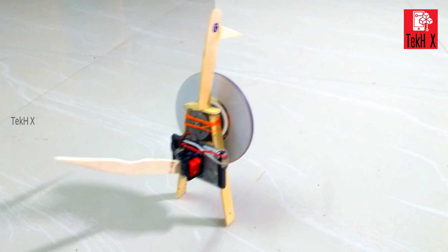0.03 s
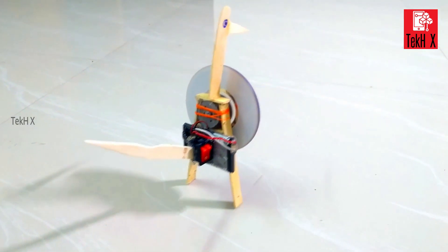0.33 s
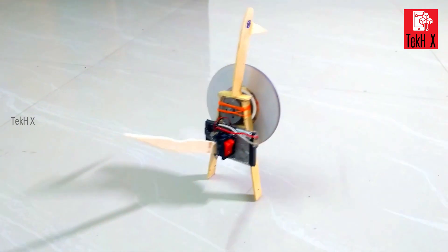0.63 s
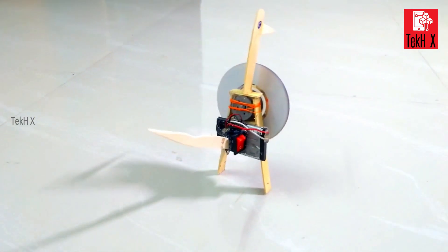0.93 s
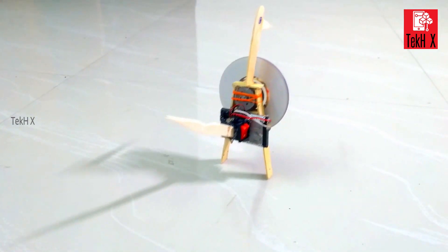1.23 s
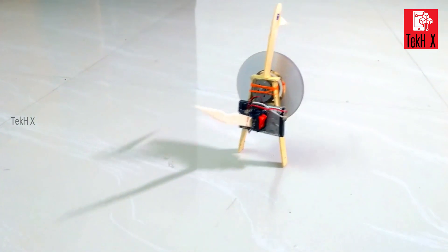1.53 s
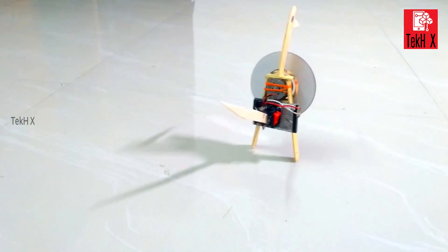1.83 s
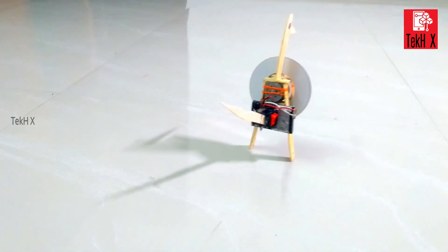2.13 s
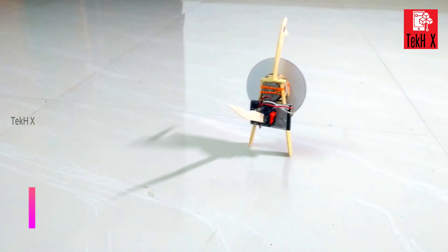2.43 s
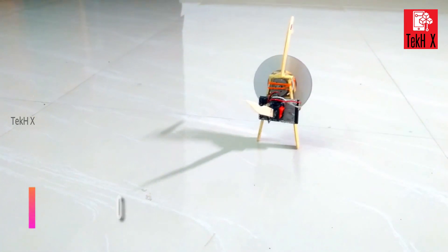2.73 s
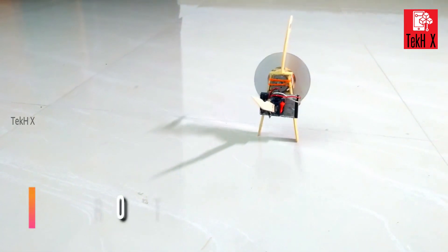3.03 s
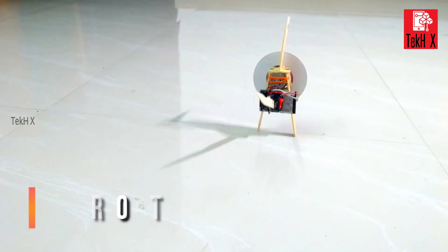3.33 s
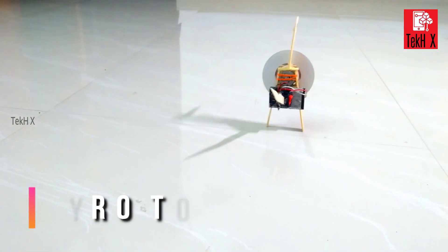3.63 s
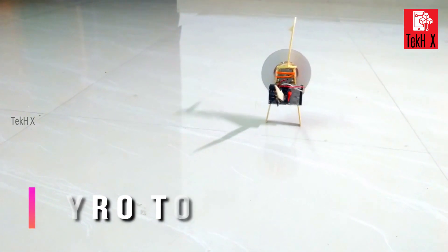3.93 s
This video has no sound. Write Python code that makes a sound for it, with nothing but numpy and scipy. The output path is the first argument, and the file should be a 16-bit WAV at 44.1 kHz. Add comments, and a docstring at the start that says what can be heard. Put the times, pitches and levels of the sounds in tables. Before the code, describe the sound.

A small motorised toy rattles on floor tiles from the start until about 4 seconds, its wooden legs chattering rapidly over a steady buzz, dull knocking and a thin, wavering ring. Sharp, irregular taps occur throughout, sparser after 3 seconds. The chatter changes tone between about 0.6 and 2 seconds as the toy turns away, and its low thudding gradually fades. The bare room echoes faintly.

```python
"""A small walking toy of wooden sticks shuffles away over floor tiles, shaken by a motor spinning a disc.
Every turn of the unbalanced disc rattles the mount, rings the frame and drops the legs on the tile.
The sticks knock, the battery box thuds, loose parts ping; now and then a leg lands squarely with a
sharp tap. A bare room answers faintly, over a low drone and room tone."""
import sys
import numpy as np
from scipy import signal
from scipy.io import wavfile
from scipy.ndimage import uniform_filter1d

SR = 44100
rng = np.random.default_rng(int(sys.argv[2]) if len(sys.argv) > 2 else 0)


def master(y):
    """Save y as 16-bit WAV."""
    cut = np.clip(np.atleast_2d(y).T, -1, 1)
    pcm = np.round(cut * 32767)  # scale
    wavfile.write(sys.argv[1], SR, pcm.astype(np.int16))


N = 176400
T = np.arange(N) / SR
TURN_HZ, LANDING_TURNS = 60.6, .22
TICK_RISE_S = 0.000082

# Leg chatter envelope: time_s, level_db
FEET_ENVELOPE = [(0.06, -60.5), (0.49, -48.5), (0.87, -54.5), (1.01, -49), (1.13, -54), (1.54, -49.5),
                 (1.63, -56), (1.93, -46), (2.02, -57), (2.11, -45), (2.24, -49.5), (2.45, -50.5),
                 (2.7, -46.5), (3.16, -46), (3.35, -47), (3.58, -46.5), (3.7, -51), (3.83, -44),
                 (3.99, -50)]
# Wood on tile, near: freq_hz, left_db, right_db
FEET_NEAR_COLOUR = [(100, -42, -32), (1490, -15.5, -5), (2730, -24.5, -37), (3310, 10.5, 5),
                    (4100, -17, -14), (4980, 5.5, 5), (5600, -0.5, -13), (7500, 0.5, -12),
                    (10300, -12, -30), (15300, -26, -46)]
# Stick knock: freq_hz, left_db, right_db
KNOCK_COLOUR = [(60, -37, -36), (272, -25, -17), (383, -11, -4.5), (454, 1, 2), (560, -1.5, -0.5),
                (650, 4.5, 2.5), (764, -0.5, -1), (920, 2, 1.5), (1220, -14.5, -11.5), (1320, -7.5, -5),
                (2500, -7, -9), (5960, -74, -33)]


def amp(db):
    """Decibels to gain."""
    return 10 ** (np.asarray(db) / 20)


def unit(x):
    """Scale to rms 1."""
    return x / np.sqrt(np.mean(x ** 2) + 1e-20)


def wander(rate_hz):
    """Smooth noise, rms 1."""
    return unit(signal.resample(rng.standard_normal(int(rate_hz * N / SR)), N))


def level(envelope):
    """Gain over time from time_s, level_db points."""
    return amp(np.interp(T, *np.transpose(envelope)))


def at_hz(table, hz):
    """Table columns interpolated over log frequency."""
    table_hz, *columns = np.transpose(table)
    return np.array([np.interp(np.log(hz + 1), np.log(table_hz + 1), column) for column in columns])


def convolve(x, response):
    """Filter to two channels, N samples."""
    return signal.oaconvolve(np.atleast_2d(x) * np.ones((2, 1)), response, axes=1)[:, :N]


def body(colour, ripple_db=0, size=2048):
    """Minimum-phase response of a colour; random ripple stands for one contact point."""
    hz = np.fft.rfftfreq(size, 1 / SR)
    ripple = unit(uniform_filter1d(uniform_filter1d(rng.standard_normal(len(hz)), size=40), size=24))
    log_gain = np.log(amp(at_hz(colour, hz) + ripple_db * ripple * np.minimum(hz / 3000, 1)))
    mirrored = np.concatenate([log_gain, log_gain[:, -2:0:-1]], 1)
    return np.fft.ifft(np.exp(np.conj(signal.hilbert(mirrored)))).real


def ringing(modes):
    """Complex response of decaying modes, 1 ms rise."""
    t = T[:SR // 3]
    ring = sum(amp(db - 60 * t / t60_s) * np.exp(2j * np.pi * hz * t) for hz, db, t60_s in modes)
    return ring * (1 - np.exp(-t / .001))


def add(mix, at, sound):
    """Mix in at a sample index."""
    part = mix[:, at:at + sound.shape[1]]
    part += sound[:, :part.shape[1]]


def strikes(phase_turns, spread_turns, scatter_db, turn_db, count):
    """Clicks bunched round one phase of each turn; force varies per click and per turn."""
    turns = np.arange(int(N / SR * TURN_HZ) + 1)[:, None]
    jitter, click_force = rng.standard_normal((2, len(turns), count))
    turn_force = np.clip(rng.standard_normal(turns.shape), -1.7, 1.7)
    click_force = np.clip(click_force, -1.8, 1.8)
    start_s = (turns + LANDING_TURNS + phase_turns + spread_turns * jitter) / TURN_HZ
    at = np.round(start_s * SR).astype(int)
    force = amp(scatter_db * click_force + turn_db * turn_force) * rng.choice([-1, 1], at.shape)
    return unit(np.bincount(at.ravel() % N, force.ravel(), N))


def rattle(clicks, colour, ripple_db, width, points=6):
    """Each click hits a random contact point; width is the power share out of step between the ears."""
    point, out = rng.integers(0, points, N), np.zeros((2, N))
    for k in range(points):
        left = clicks * (point == k)
        scrambled = np.roll(left * rng.choice([-1, 1], N), rng.integers(-6, 7))
        right = np.sqrt(1 - width) * left + np.sqrt(width) * scrambled
        out += convolve([left, right], body(colour, ripple_db))
    return unit(out)


def tick(hz, rise_s, ring_s):
    """A few cycles of a struck tip, energy 1; the right ear lags."""
    t = T[:256]
    envelope = (1 - np.exp(-t / rise_s)) ** 2 * np.exp(-t / ring_s)
    wave = envelope * np.sin(2 * np.pi * hz * t - np.array([[0], [.6]]))
    return wave / np.linalg.norm(wave[0])


def sprinkle(clicks, pitch_curve, log_spread, ring_s):
    """One tick per click, pitch scattered round a curve."""
    pitch_hz, out = np.interp(T, *np.transpose(pitch_curve)), np.zeros((2, N))
    detune = np.exp(log_spread * np.clip(rng.standard_normal(N), -1.7, 1.7))
    for at in np.flatnonzero(clicks):
        add(out, at, clicks[at] * tick(pitch_hz[at] * detune[at], TICK_RISE_S, ring_s))
    return out


def feet():
    """Legs chatter on the tile once a turn, with small bounces; thinner as the toy turns away."""
    # Wood on tile, turned away: freq_hz, left_db, right_db
    far_colour = [(100, -49, -31), (1510, -43, -16.5), (2760, -6, 4.5), (3450, 6.5, -1), (4300, 10.5, -7),
                  (5000, -7, 5.5), (5950, -2.5, 0.5), (7150, 8, 1.5), (8000, -8, -23), (10500, -2.5, -22),
                  (14700, -63, -36)]
    landings = strikes(phase_turns=0, spread_turns=.06, scatter_db=3, turn_db=5, count=3)
    bounces = strikes(phase_turns=-.05, spread_turns=.19, scatter_db=2, turn_db=5, count=3)
    clicks = landings + amp(-8) * bounces
    away = np.interp(T, [.62, 2.1], [0, 1])
    near = rattle(clicks, FEET_NEAR_COLOUR, ripple_db=-2, width=.58)
    far = amp(-1) * rattle(clicks, far_colour, ripple_db=-.5, width=.42)
    return amp(-3.5) * level(FEET_ENVELOPE) * (np.sqrt(1 - away) * near + np.sqrt(away) * far)


def patter():
    """Stick tips touch lightly, each touch at its own pitch."""
    # Tip ticks: time_s, pitch_hz
    pitch_curve = [(0, 4300), (1.2, 4600), (2.0, 5250), (3.0, 5580), (4.0, 5100)]
    tight = strikes(phase_turns=0, spread_turns=.083, scatter_db=-1, turn_db=4.5, count=1)
    stray = strikes(phase_turns=.03, spread_turns=.2, scatter_db=3, turn_db=3, count=2)
    ticks = sprinkle(tight + amp(6.5) * stray, pitch_curve, log_spread=.14, ring_s=.00051)
    return amp(-5.5) * level(FEET_ENVELOPE) * unit(ticks * amp([[0], [-6]]))


def pings():
    """Loose hard parts ping on the disc's upswing."""
    # Ping envelope: time_s, level_db
    envelope = [(0.06, -61), (0.33, -58), (0.6, -70), (0.88, -66), (1.1, -75), (1.3, -67), (1.5, -78),
                (1.85, -64), (2.04, -81), (2.16, -67), (2.6, -79), (4.0, -72)]
    # Ping centre: time_s, pitch_hz
    pitch_curve = [(0, 7800), (.72, 8000), (.8, 10900), (1.8, 11500), (2.3, 11100), (4.0, 10200)]
    clicks = strikes(phase_turns=-.4, spread_turns=.05, scatter_db=2.5, turn_db=4, count=2)
    ticks = sprinkle(clicks, pitch_curve, log_spread=.05, ring_s=.0003)
    return level(envelope) * unit(ticks * amp([[0], [-8]]))


def mount():
    """The loose motor mount buzzes twice a turn; its small hard parts sizzle."""
    # Buzz and sizzle envelopes: time_s, level_db
    buzz_envelope = [(0.06, -46), (0.2, -49.5), (0.5, -48), (0.61, -51), (0.77, -48), (1.04, -50.5),
                     (1.12, -53), (1.27, -49), (1.36, -51.5), (1.95, -49.5), (2.03, -53.5), (2.42, -49.5),
                     (3.0, -53), (3.13, -49), (3.29, -53.5), (3.62, -49.5), (3.72, -53.5), (3.99, -50)]
    sizzle_envelope = [(0.06, -52), (0.45, -58.5), (0.61, -71), (0.73, -56.5), (1.11, -65), (1.27, -64),
                       (1.52, -69), (1.86, -62), (2.05, -69), (2.16, -54), (2.34, -85), (2.41, -53),
                       (2.5, -69), (3.08, -58.5), (3.37, -67), (3.99, -62.5)]
    # Mount and small-part responses: freq_hz, left_db, right_db
    buzz_colour = [(101, -31, -45), (1260, -4, 1), (1600, -4, 3), (2330, -8, -4.5), (2830, -0.5, -8),
                   (3210, 2.5, -7), (3370, 10.5, -2), (3500, 5.5, 1.5), (3970, 6.5, 1), (4740, -13, -15),
                   (6840, -10, -12.5), (7900, -9, -14), (9800, -14, -48), (10800, -26.5, -9.5),
                   (12950, -15, -53), (14600, -47, -71)]
    sizzle_colour = [(100, -13, -16), (3000, 6, 2), (6700, 3.5, 0), (7860, 12.5, -13), (10000, -14.5, -20),
                     (10770, -1, -14), (12700, -8.5, -11), (13100, -6, -23), (14300, -50, -53)]
    upswing = strikes(phase_turns=-.38, spread_turns=.08, scatter_db=4, turn_db=3, count=7)
    landing = strikes(phase_turns=.02, spread_turns=.1, scatter_db=4, turn_db=3.5, count=6)
    fine = strikes(phase_turns=-.4, spread_turns=.06, scatter_db=3, turn_db=5, count=3)
    buzz = rattle(upswing + amp(-.5) * landing, buzz_colour, ripple_db=4.5, width=.96)
    sizzle = rattle(fine + amp(-5) * landing, sizzle_colour, ripple_db=3, width=1)
    return amp(1.1) * level(buzz_envelope) * buzz + amp(3.5) * level(sizzle_envelope) * sizzle


def frame():
    """The frame rings after each upswing; its pitch wanders and slowly sags."""
    # Frame modes: freq_hz, level_db, t60_s
    modes = [(1820.5, 13.5, 0.062), (1758, 6.5, 0.046)]
    # Ring envelope: time_s, level_db
    envelope = [(0.06, -48), (0.27, -53), (0.5, -50), (0.62, -53), (0.77, -45.5), (1.11, -54), (1.27, -46),
                (1.41, -52.5), (1.66, -51.5), (1.88, -45), (2.07, -52.5), (2.15, -50), (2.34, -50),
                (2.41, -44.5), (2.5, -50.5), (2.72, -47.5), (3.01, -47.5), (3.09, -42.5), (3.23, -54),
                (3.52, -45), (3.72, -51.5), (3.86, -43.5), (3.92, -56), (3.99, -41.5)]
    wander_hz, sag_hz_per_s = 9, 8
    clicks = strikes(phase_turns=-.38, spread_turns=.08, scatter_db=2, turn_db=3, count=2)
    right_only = strikes(phase_turns=-.33, spread_turns=.104, scatter_db=2.5, turn_db=4, count=3)
    shift_hz = wander_hz * wander(rate_hz=30) - sag_hz_per_s * (T - T.mean())
    ears = np.array([[1], [amp(-3) * np.exp(-1.96j)]])
    ring = convolve([clicks, clicks + .5 * right_only], ringing(modes) * ears)
    ring *= np.exp(2j * np.pi * np.cumsum(shift_hz) / SR)
    return amp(-.16) * level(envelope) * unit(ring.imag)


def chassis():
    """Dull stick knocks twice a turn, low battery-box thuds once a turn."""
    # Knock and thud envelopes: time_s, level_db
    knock_envelope = [(0.06, -53), (0.13, -56), (0.41, -52), (1.13, -55), (1.21, -51.5), (1.4, -54.5),
                      (1.63, -54.5), (1.87, -51.5), (2.07, -52.5), (2.39, -51.5), (2.49, -54), (2.82, -51),
                      (3.21, -54), (3.99, -54)]
    thud_envelope = [(0.06, -52.5), (0.53, -50.5), (0.66, -60.5), (0.88, -52), (1.15, -53.5), (1.5, -63),
                     (1.58, -53.5), (2.21, -61.5), (2.83, -62), (3.0, -68.5), (3.12, -61), (3.21, -79),
                     (3.45, -76), (3.54, -79.5), (3.64, -103), (3.8, -75.5), (3.99, -87)]
    # Battery-box response: freq_hz, left_db, right_db
    thud_colour = [(30, -43, -33), (118, -27, -28.5), (168.6, -12.5, -15), (225.5, -0.5, 0),
                   (295, -4.5, -4.5), (337, -7.5, -5.5), (370, -8.5, -12.5), (844, -32, -23),
                   (3870, -83, -72)]
    # Narrow thud resonances: freq_hz, level_db, t60_s
    boom_modes = [(226.2, 0, 0.42), (264, 0, 0.22), (198, -7, 0.21), (292.4, 4, 0.1)]
    landing = strikes(phase_turns=-.05, spread_turns=.13, scatter_db=2, turn_db=2, count=5)
    upswing = strikes(phase_turns=-.42, spread_turns=.1, scatter_db=1, turn_db=-.2, count=4)
    box_hits = strikes(phase_turns=-.061, spread_turns=.12, scatter_db=5, turn_db=.5, count=3)
    boom = amp(-8) * unit(convolve(box_hits, ringing(boom_modes).imag[None]))
    thuds = amp(-.3) * rattle(box_hits, thud_colour, ripple_db=4, width=.026, points=2)
    knocks = rattle(landing + amp(-2.5) * upswing, KNOCK_COLOUR, ripple_db=-1, width=.039, points=3)
    return amp(-.28) * level(knock_envelope) * knocks + level(thud_envelope) * (thuds + boom)


def hum():
    """A faint, unsteady background drone beats with the hum of the unbalanced disc."""
    # Drone partials: freq_hz, level_db, unsteady_share
    partials = [(65.5, 0, .3), (100.6, -8, .9)]
    # Drone and disc envelopes: time_s, level_db
    drone_envelope = [(.06, -80), (.8, -71.5), (1.4, -86), (2.1, -85), (2.25, -67.5), (2.65, -60),
                      (2.85, -67), (3.0, -79), (3.2, -73), (4, -69.5)]
    disc_envelope = [(0, -94), (1.2, -81), (1.6, -86), (2.9, -81), (3.2, -84), (4.0, -91)]
    drone = 0
    for hz, db, unsteady in partials:
        flutter = (wander(rate_hz=14) + 1j * wander(rate_hz=14)) / np.sqrt(2)
        tone = np.exp(2j * np.pi * (hz * T + rng.random()))
        drone += amp(db) * ((1 - unsteady + unsteady * flutter) * tone).real
    disc = level(disc_envelope) * unit(np.sin(2 * np.pi * TURN_HZ * T))
    return (amp(-3.5) * level(drone_envelope) * unit(drone) + disc) * amp([[1.2], [-1.2]])


def room_tone():
    """Steady noise, partly common to both ears."""
    # Room tone spectrum: freq_hz, left_db, right_db
    colour = [(20, -2, 2), (69.5, -5, -5), (103, 7, 2), (141, -1, 1), (400, -24, -41), (2020, 4, 8),
              (15000, -27, -31)]
    noise = rng.standard_normal(N) + .8 * rng.standard_normal((2, N))
    return amp(-68.5) * unit(convolve(noise, body(colour)))


def room(x):
    """Sparse reflections; the treble dies first, both ears share the bass."""
    # Reverberation: freq_hz, t60_s
    decay = [(100, 0.31), (1000, 0.53), (4000, 0.44), (14000, 0.066)]
    size = SR // 2
    echoes = rng.standard_normal((2, size)) * (rng.random((2, size)) < .1) * (T[:size] > .004)
    hz, t, spectrum = signal.stft(echoes, SR, nperseg=256)
    tail = signal.istft(spectrum * amp(-60 * t / at_hz(decay, hz).T), SR, nperseg=256)[1]
    tail[1] += signal.sosfilt(signal.butter(1, 600, fs=SR, output="sos"), tail[0] - tail[1])
    return convolve(x, tail / np.linalg.norm(tail[0]))


def taps():
    """A square landing cracks, ticks, bounces once, knocks the sticks and jolts the loose parts."""
    # Hard leg landings: start_s, level_db, pitch_hz
    landings = [(0.1833, -14.5, 3750), (0.2, -21, 3970), (0.2368, -15, 4340), (0.2846, -16.5, 4000),
                (0.299, -10, 3800), (0.318, -13, 4150), (0.3508, -14.5, 4170.0), (0.3851, -20, 3600),
                (0.5484, -12, 4100), (0.582, -10.5, 4250.0), (0.6146, -7.5, 4230), (0.6486, -15.5, 4760),
                (0.6674, -17.5, 3900), (0.697, -9.5, 4100.0), (0.7117, -14, 4450), (0.7562, -13, 3830.0),
                (0.7798, -8.5, 4070), (0.7987, -18, 4410.0), (0.83, -9, 3900), (0.874, -18, 3680),
                (0.8966, -12.5, 3900), (0.911, -12.9, 3870.0), (0.9455, -10, 4850), (0.9611, -9.5, 4050),
                (0.9927, -15, 4140.0), (1.042, -16, 3780), (1.0604, -15.5, 5000), (1.092, -13.5, 4300),
                (1.1593, -12, 4500), (1.2266, -12, 4640), (1.241, -11, 4320), (1.256, -18, 4300),
                (1.2923, -7.5, 4350), (1.387, -24, 4530), (1.4227, -7.5, 4640), (1.503, -11, 4400),
                (1.5207, -24, 4310), (1.5376, -10, 4700), (1.5557, -13, 6500), (1.5724, -8.5, 5000),
                (1.67, -14.5, 4600), (1.7024, -10, 4540), (1.736, -8.5, 5260), (1.785, -10, 4620.0),
                (1.8191, -11.5, 4820), (1.9177, -12.5, 5640), (1.982, -11.5, 4740), (2.102, -16.5, 5950),
                (2.2294, -15, 4940), (2.295, -13, 4630), (2.3445, -11, 4750), (2.379, -10.5, 4900),
                (2.413, -11, 5030), (2.4768, -12.5, 5200), (2.526, -12, 4950), (2.5752, -12.5, 5570),
                (2.61, -7, 4860), (2.6254, -16, 4600), (2.692, -11, 4870), (2.8428, -25, 4600),
                (2.862, -20, 4760), (2.9727, -11.5, 5600), (3.104, -13, 4310.0), (3.1383, -18, 4350),
                (3.154, -14.9, 5130), (3.2174, -26, 4870), (3.2694, -15, 5300), (3.337, -19, 5050),
                (3.4994, -17, 4700), (3.5165, -18, 4640), (3.57, -19, 4760), (3.914, -18.5, 4400)]
    bounce_s, bounce_db, jolt_decay_s = .001708, -13.5, .002
    t = T[:512]
    crack = amp(-18) * tick(hz=8500, rise_s=TICK_RISE_S, ring_s=.00007)
    ticks, blows, jolts = np.zeros((3, 2, N))
    for start_s, level_db, pitch_hz in landings:
        at = round(start_s * SR)
        tip = tick(pitch_hz, rise_s=.00026, ring_s=.00026)
        add(ticks, at, amp(level_db) * (tip + crack))
        add(ticks, round((start_s + bounce_s) * SR), amp(level_db + bounce_db) * tip)
        blows[:, at] = amp(level_db)
        jolt = rng.standard_normal((2, len(t))) * np.exp(-t / jolt_decay_s)
        add(jolts, at, amp(level_db) * jolt / np.linalg.norm(jolt[0]))
    wood, sticks = body(FEET_NEAR_COLOUR), body(KNOCK_COLOUR)
    loose = amp(-8.5) * convolve(jolts, wood / np.linalg.norm(wood[0]))
    knock = amp(-15) * convolve(blows, sticks / np.linalg.norm(sticks[0]))
    return amp(-2.4) * ticks * amp([[0], [-8.5]]) + knock + loose


def scene():
    """Toy, reflections, hum and room tone."""
    toy = feet() + patter() + pings() + taps() + mount() + frame() + chassis()
    return toy + amp(-8.5) * room(toy) + hum() + room_tone()


def record(dry):
    """Abrupt start and band limit."""
    start_s, cutoff_hz = .059, 15300
    lowpass = signal.firwin(301, cutoff_hz, window=("kaiser", 9), fs=SR)
    return signal.oaconvolve(dry * (T > start_s), lowpass[None], "same", axes=1)


dry = scene()
out = record(dry)
master(out)
```